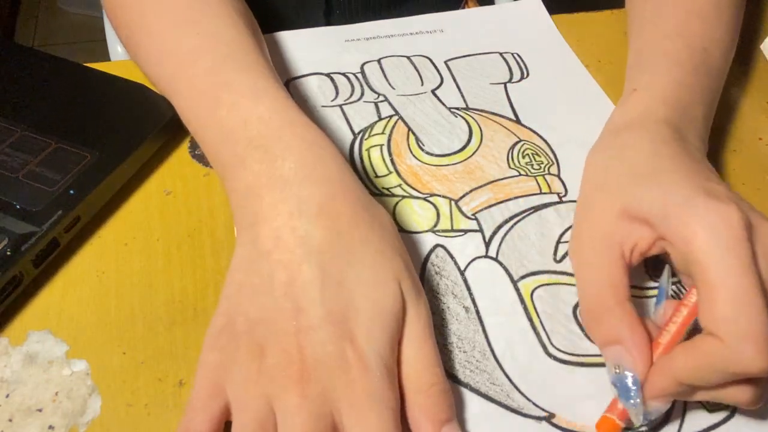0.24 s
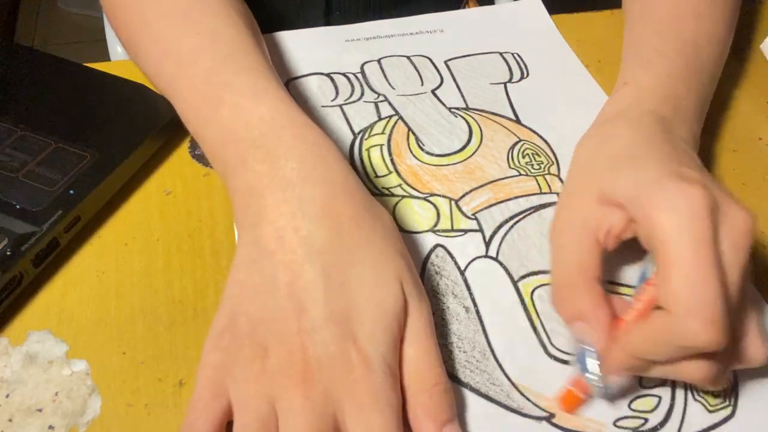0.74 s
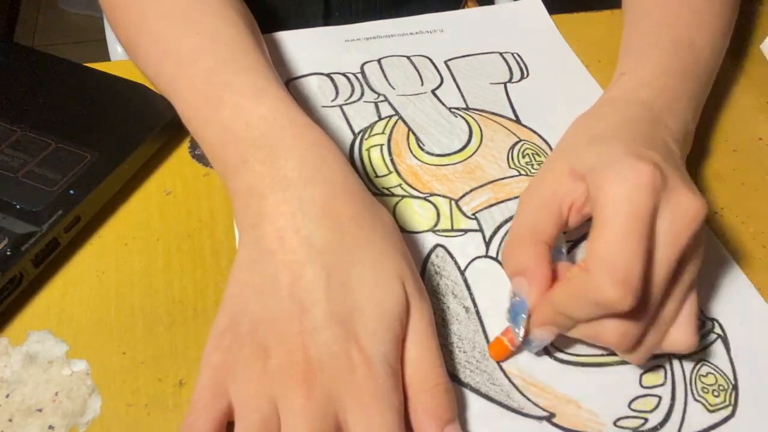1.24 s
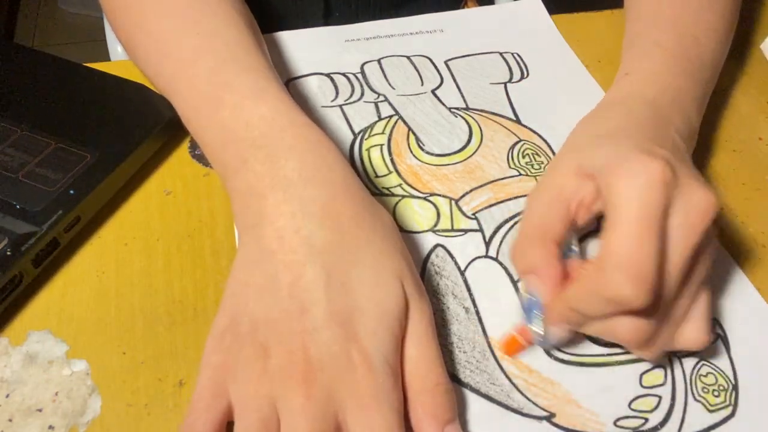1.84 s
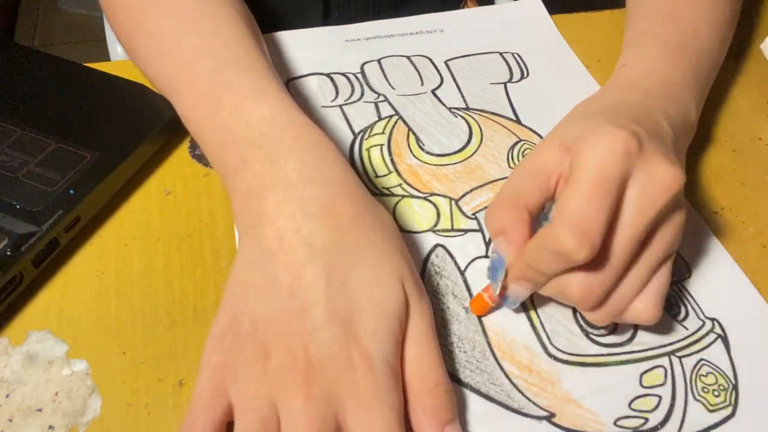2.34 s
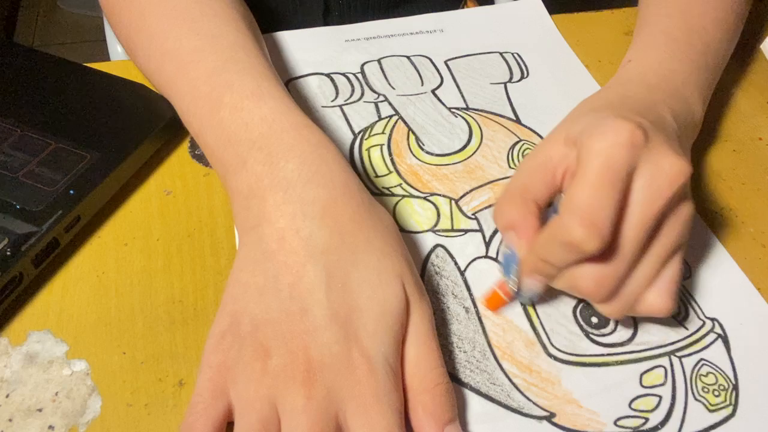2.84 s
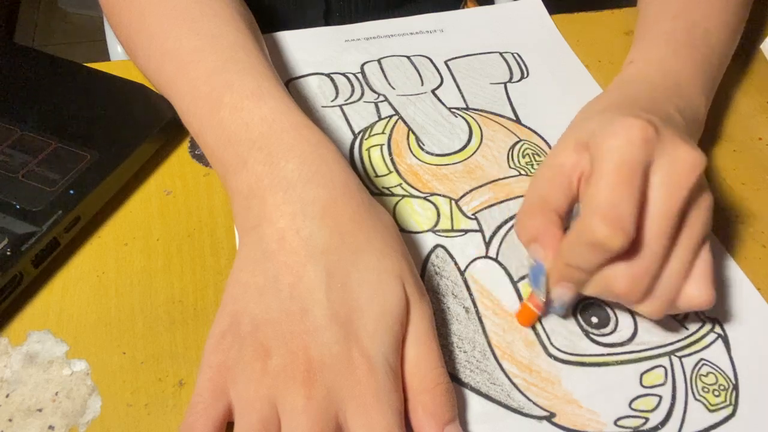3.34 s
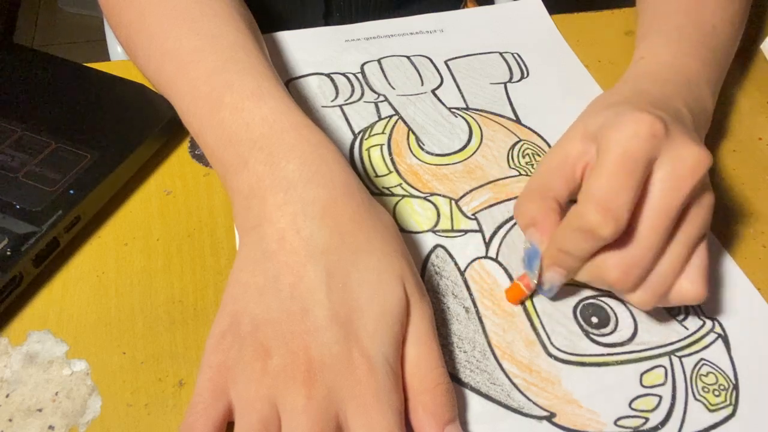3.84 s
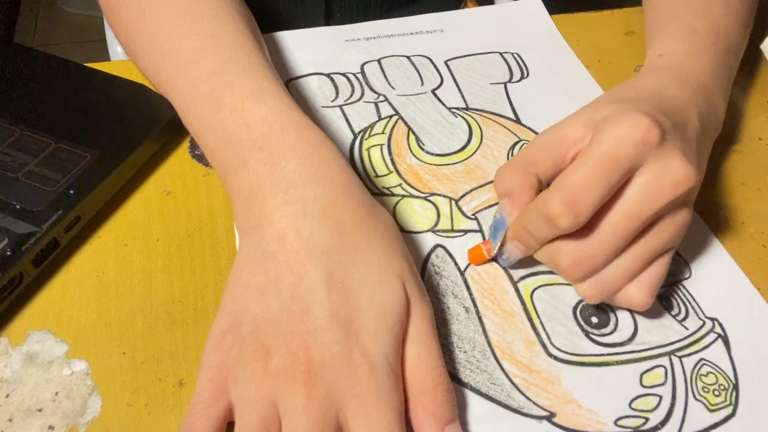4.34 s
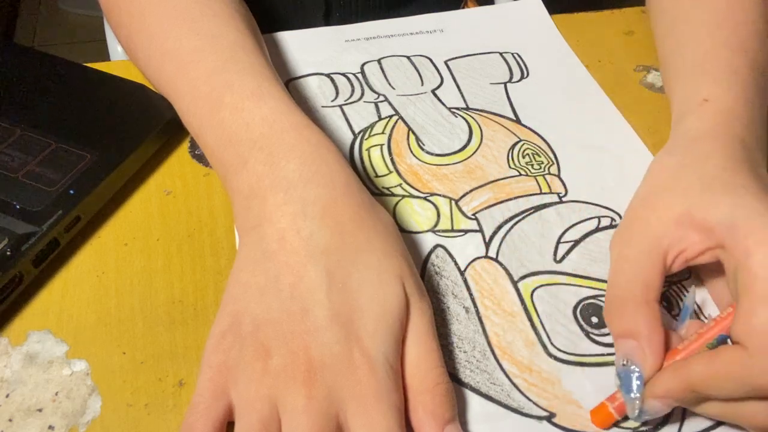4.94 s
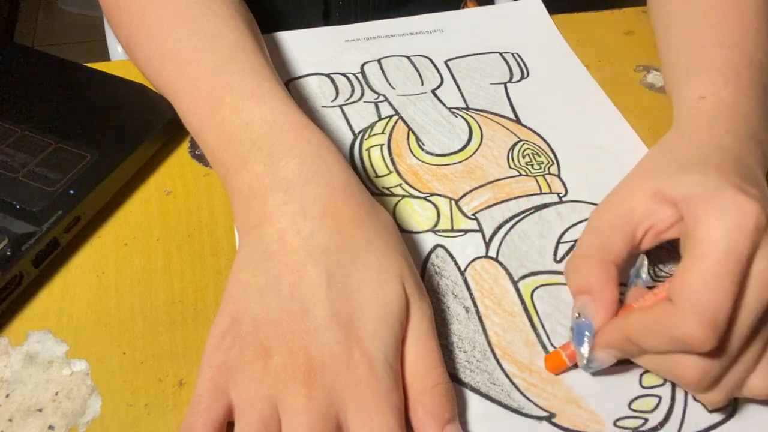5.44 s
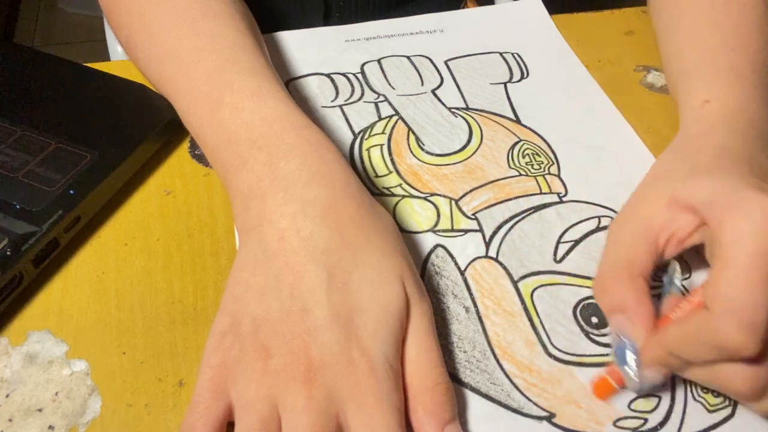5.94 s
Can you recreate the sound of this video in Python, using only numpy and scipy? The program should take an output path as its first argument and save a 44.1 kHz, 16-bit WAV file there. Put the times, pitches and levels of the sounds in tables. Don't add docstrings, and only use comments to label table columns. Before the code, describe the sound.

Quick, regular crayon scribbling on a paper sheet, a few hollow taps, a brief slide, then more scribbling above a steady deep hum.

```python
import sys
import numpy as np
from scipy import signal
from scipy.fft import rfft, irfft, next_fast_len
from scipy.io import wavfile

SR = 44100
rng = np.random.default_rng(int(sys.argv[2]) if len(sys.argv) > 2 else 0)


def invert_db(level):
    return 10 ** (np.asarray(level, dtype=float) / 20)


def persist_wave(psi):
    counts = np.round(np.clip(psi, -1, 1) * 32767).astype(np.int16)
    wavfile.write(sys.argv[1], SR, np.atleast_2d(counts).T)


N = 273420
T = np.arange(N) / SR
SIZE = next_fast_len(N + 4096)
HZ = np.arange(SIZE // 2 + 1) * SR / SIZE

# pitch_hz, in_step_s, level_db, left_minus_right_db
SHAFT_TONES = [(48.277, 1.73, -49.8, -6.5), (48.705, 1.73, -48.2, -5.9), (96.55, .307, -65, -3),
               (97.42, .307, -60.6, -9.6)]
BLADE_TONES = [(144.76, .168, -49, -8.2), (148.57, .168, -45.7, -7.4), (145.459, .1702, -57.5, -9),
               (146.316, .166, -62, -7.3), (143.012, .1704, -62, -9)]
WHINE_TONES = [(167.98, 0, -63, -9), (200.6, 0, -56, -8.5), (248.89, 0, -70, -9), (1162.28, 0, -79.5, -2),
               (1216, 0, -85, -2), (1287.42, 0, -87, 2)]
# time_s, level_db
SHAFT_LOAD = [(0, 0), (1.1, -0.5), (1.7, -1), (2.4, 2), (3.4, -0.5), (4.2, 1), (4.8, 0.5), (5.6, -1),
              (6.1, 2)]
BLADE_LOAD = [(0, -3), (.7, -1.5), (1.0, 0), (1.22, -6.5), (1.5, 1.5), (2.3, 1), (3, 0), (5.6, 0), (6.1, 3)]

# pitch_hz, level_db
DEEP_COLOUR = [(28, -23), (42, -8), (60, -5.5), (120, 1), (150, 0.5), (200, -23)]
RUMBLE_COLOUR = [(110, -38.5), (160, -4), (190, 0), (250, -7), (330, -12.5), (460, -11.5), (560, -27),
                 (700, -28)]
AIR_COLOUR = [(450, 28), (620, 13), (760, 25), (900, 22), (1150, 27), (1350, 19.5), (2150, 15.5),
              (2400, 7.5), (2800, 8), (3700, -5), (4800, 2), (6100, -4.5), (9000, -4.5), (11000, -10),
              (15600, -26)]
# pitch_hz, width_hz, lift_db
ROOM_MODES = [(65, 8, 6), (90, 4.3, -25), (127, 2.8, 5.5), (121.3, 24, -3.5), (250, 16, 5), (171, 5.4, 3.5),
              (179.3, 9.4, -5.5), (337, 51, -2), (345.5, 3.9, 7), (382, 14, -3), (411.4, 32, 2),
              (458.6, 9, 3), (700, 45, 7.5), (784, 48, -9), (1027, 34, 4), (7030, 580, 11)]
# time_s, level_db
DRAUGHT = [(0, -1), (.3, -2), (.9, 1.5), (1.2, 0), (1.8, 0.8), (2.2, -2), (2.6, 1.2), (3.2, 0.5), (4, -1.5),
           (5.1, 0.8), (5.6, -1), (6, 2.5)]
DEEP_DB, RUMBLE_DB, AIR_DB = -49.5, -51, -64.5
RUMBLE_FOLLOWS = 0.48

# pitch_hz, level_db
TIP_COLOUR = [(3000, -10), (5500, -5), (7000, -7), (8400, -2), (9300, -4.5), (10300, -9.5), (11700, -7.5),
              (12800, -5), (14000, -5.5), (15680, -9)]
SIZZLE_COLOUR = [(5800, -21.5), (6800, -3.5), (7600, -1), (8400, -1), (9300, -38)]
PAPER_COLOUR = [(1200, 9), (1800, 0), (2200, 5), (2550, 12.5), (3000, 2), (3800, 1.5), (4300, 0.5),
                (4900, 0), (6000, -9), (7500, -12)]
THRUM_COLOUR = [(200, 10), (350, 36), (700, 12.5), (1300, 13), (1800, -27.5), (2300, -3.5), (3200, -1)]
# pitch_hz, width_hz, lift_db
SHEET_MODES = [(2500, 160, -1.5), (3900, 370, 1), (4900, 170, -4.5), (8260, 730, -5.5), (12300, 210, 0)]
# pitch_hz, fade_60db_s, level_db
LOOSE_SHEET = [(1980, 0.013, -30), (2127, 0.0054, -2.5), (2500, 0.2, -13), (3200, 0.0055, -22),
               (3920, 0.015, -17.5), (4900, 0.026, -15), (5680, 0.022, -24), (7650, 0.018, -9)]
# middle_s, hiss_db, weight_db
FIRST_PATCH = [(.075, -80.5, 5), (.201, -72.5, -0.5), (.349, -72.5, 2.5), (.481, -70, -1), (.626, -69, 0.5),
               (.76, -67, -1.5), (.902, -68.5, -4), (1.034, -69.5, -1), (1.179, -71, 0), (1.313, -67.5, 1),
               (1.462, -70.5, 0), (1.599, -72, 2), (1.752, -70.5, -2), (1.879, -70, -1), (2.019, -70, 0),
               (2.157, -70.5, 1), (2.3, -67, -1.5), (2.435, -68.5, 1), (2.577, -67.5, -3),
               (2.71, -70.5, -0.5), (2.857, -69, -2), (2.994, -70.5, 1), (3.135, -69.5, 1.5),
               (3.277, -70, 1), (3.415, -69.5, 1.5), (3.556, -70, 2.5), (3.691, -70, 0.5), (3.834, -73, 3),
               (3.961, -71.5, -1), (4.09, -77.5, 3.5)]
# middle_s, hiss_db, weight_db
SECOND_PATCH = [(5.123, -75, 2), (5.25, -70, -1.5), (5.402, -72, 2.5), (5.537, -69.5, 3),
                (5.684, -68.5, -1.5), (5.823, -69, 0), (5.963, -69.5, -5), (6.095, -72, 1), (6.235, -73, 7)]
# middle_s, width_s, hiss_db
GLIDES = [
    (4.235, 0.083, -77.5),
    (4.37, 0.14, -79.5),
    (4.485, 0.15, -70),
    (4.573, .13, -67),
    (4.763, .13, -77),
    (2.645, 0.076, -76),
]
# width_s, body_over_hiss_db, thrum_over_body_db, sizzle_over_hiss_db
OUT = (0.0844, 0.33, 0.89, 1.8)
BACK = (0.0745, 0.6, 0.8, -0.56)
GLIDING = (-12, 1.4)
GLIDING_BODY_DB = 1.6
BODY_FOLLOWS = 0.35
SECOND_BODY_DB, SECOND_THRUM_DB = -2, 1.5
UNEVEN_DB = 0.88

# start_s, level_db, pitch_hz
KNOCKS = [(1.257, -40.5, 1390), (1.269, -52, 1290), (1.491, -56, 1300), (1.955, -56, 1280),
          (2.142, -62, 1350), (2.316, -43, 1276), (2.408, -58, 1270), (2.588, -42.5, 1450),
          (2.6, -49, 1410), (3.138, -56, 1290), (3.237, -49.5, 1370), (3.357, -57, 1330),
          (5.098, -56, 1290)]
# start_s, level_db, pitch_hz
NAIL_TICKS = [(.012, -68, 5000), (.161, -63, 4840), (.432, -68, 4900), (.683, -65, 4900),
              (1.027, -59, 4900), (1.258, -55, 4800), (1.268, -59, 4850), (1.279, -56, 4900),
              (1.466, -65, 4700), (1.491, -52.5, 3200), (1.868, -62, 4700), (1.955, -55.5, 2980),
              (2.142, -69, 3300), (2.316, -58, 4750), (2.589, -48.5, 4720), (2.591, -49.5, 3150),
              (2.59, -49, 7870), (2.608, -62, 4950), (2.646, -55, 4870), (2.664, -64, 4730),
              (3.137, -64, 3200), (3.237, -62, 2500), (4.926, -72, 4800), (5.228, -66, 3900)]
# pitch_hz, level_db
CRACK_COLOUR = [(1500, -22), (2500, 2), (3200, -2), (4000, -0.5), (6000, -5), (8000, -3), (11000, -15.5),
                (15500, -27)]
KNOCK_CRACK_DB, NAIL_CRACK_DB = -15.5, -15
NAIL_T60_S, NAIL_DRAG_S = 0.014, 0.006

SQUEAK_S, SQUEAK_HZ, SQUEAK_DB = (0.53, 0.74), (15400, 12300), -81

# pitch_hz, left_leads_rad, likeness_0_to_1, left_minus_right_db
PORTS = [(20, -.35, .97, -6), (170, -.05, .93, -6.5), (300, .7, .5, -3.3), (450, 1.3, .75, -2.3),
         (700, 3.1, .7, .3), (1500, 12.0, .45, -.5), (3300, 25.0, .3, 0), (5200, 27.7, .38, 0),
         (6600, 33.0, .2, -2.5), (7500, 35.5, .62, -3.5), (8600, 35.2, .66, -3), (9300, 34.5, .84, -.3),
         (14600, 28.3, .92, 0), (15700, 27.0, .85, 0)]


def rms_one(x):
    return x / np.sqrt(np.mean(x ** 2) + 1e-20)


def coloured(x, spectrum, modes=()):
    hz, db = np.transpose(spectrum)
    level_db = np.interp(np.log(HZ + 1), np.log(hz), db, left=-90, right=-90)
    for centre_hz, width_hz, lift_db in modes:
        level_db = level_db + lift_db * np.exp(-2 * ((HZ - centre_hz) / width_hz) ** 2)
    return rms_one(irfft(rfft(x, SIZE) * invert_db(level_db), SIZE)[..., :N])


def drift(rate):
    knots = rng.standard_normal(int(T[-1] * 200) + 400)
    r = np.exp(-2 * np.pi * rate / 200)
    slow = signal.lfilter([1], [1, -2 * r, r * r], knots)[300:]
    return np.interp(T * 200, np.arange(len(slow)), rms_one(slow - slow.mean()))


def ring(x, hz, t60):
    r, w = invert_db(-60 / (t60 * SR)), 2 * np.pi * hz / SR
    return signal.lfilter([0, np.sin(w)], [1, -2 * r * np.cos(w), r * r], x + 1e-18)


def tones(lines, lead):
    out = np.zeros((2, N))
    for hz, in_step_s, level_db, balance_db in lines:
        phase = 2 * np.pi * hz * (T - in_step_s)
        left = invert_db(balance_db) * np.cos(phase + lead)
        out += np.sqrt(2) * invert_db(level_db) * np.array([left, np.cos(phase)])
    return out


def motors():
    shafts = invert_db(np.interp(T, *np.transpose(SHAFT_LOAD))) * tones(SHAFT_TONES, lead=-0.48)
    blades = invert_db(np.interp(T, *np.transpose(BLADE_LOAD))) * tones(BLADE_TONES, lead=0.035)
    whines = invert_db(0.8 * drift(1.5)) * tones(WHINE_TONES, lead=0.067)
    return shafts + blades + whines


def room_noise():
    draught_db = np.interp(T, *np.transpose(DRAUGHT))
    deep = coloured(rng.standard_normal((2, N)), DEEP_COLOUR, ROOM_MODES)
    rumble = coloured(rng.standard_normal((2, N)), RUMBLE_COLOUR, ROOM_MODES)
    air = coloured(rng.standard_normal((2, N)), AIR_COLOUR, ROOM_MODES)
    deep = invert_db(DEEP_DB + draught_db) * deep
    rumble = invert_db(RUMBLE_DB + RUMBLE_FOLLOWS * draught_db) * rumble
    return deep + rumble + invert_db(AIR_DB + 0.4 * drift(2.7)) * air


def strokes():
    rows = []   # middle_s, width_s, hiss_db, body_db, thrum_db, sizzle_db
    patches = [(FIRST_PATCH, (OUT, BACK), 0, 0),
               (SECOND_PATCH, (BACK, OUT), SECOND_BODY_DB, SECOND_THRUM_DB)]
    for patch, kinds, patch_body_db, patch_thrum_db in patches:
        for k, (middle, hiss_db, weight_db) in enumerate(patch):
            width, body_db, thrum_db, sizzle_db = kinds[k % 2]
            body_db += patch_body_db + BODY_FOLLOWS * weight_db
            thrum_db += patch_thrum_db + weight_db
            rows.append((middle, width, hiss_db, body_db, thrum_db, sizzle_db))
    for middle, width, hiss_db in GLIDES:
        rows.append((middle, width, hiss_db, GLIDING_BODY_DB, *GLIDING))
    rows = np.array(rows)
    rows[:, 3:] += UNEVEN_DB * rng.standard_normal((len(rows), 3))
    return rows


def grains(per_s, spread_db):
    sizes = invert_db(spread_db * np.minimum(rng.exponential(1, (2, N)), 5))
    sizes = sizes * rng.choice([-1, 1], (2, N))
    return sizes * (rng.random((2, N)) < per_s / SR)


def flutter(slips):
    out = np.zeros((2, N))
    for hz, t60, level_db in LOOSE_SHEET:
        out += invert_db(level_db + 2.8 * drift(5.6)) * rms_one(ring(slips, hz, t60))
    return out


def crayon():
    hiss, body, thrum, sizzle = np.zeros((4, N))
    for middle, width, hiss_db, body_db, thrum_db, sizzle_db in strokes():
        near = slice(max(int((middle - 1.5 * width) * SR), 0), int((middle + 1.5 * width) * SR))
        speed = np.cos(np.pi * np.clip((T[near] - middle) / (1.85 * width), -0.5, 0.5)).clip(0)
        hiss[near] += (invert_db(hiss_db + 3.5) * speed ** 2.37) ** 2
        sizzle[near] += (invert_db(hiss_db + sizzle_db - 3.0) * speed ** 1.55) ** 2
        body[near] += (invert_db(hiss_db + body_db + 1.5) * speed ** 1.6) ** 2
        thrum[near] += (invert_db(hiss_db + body_db + thrum_db + 10.5) * speed ** 1.8) ** 2
    linger = np.exp(-1 / (0.0029 * SR))
    body, thrum = signal.lfilter([1 - linger], [1, -linger], [body, thrum])

    grip = drift(29)
    fine = grains(14000, spread_db=2.5)
    tip = np.sqrt(hiss) * invert_db(1.1 * grip) * coloured(fine, TIP_COLOUR, SHEET_MODES)
    sizzling = coloured(fine[:, ::-1], SIZZLE_COLOUR, SHEET_MODES)
    tip += np.sqrt(sizzle) * invert_db(0.94 * grip + 2.3 * drift(28)) * sizzling

    catch = grains(5000, spread_db=2.5)
    sheet = invert_db(1.23 * drift(25)) * coloured(catch, PAPER_COLOUR, SHEET_MODES) + flutter(catch)
    table = invert_db(1.2 * drift(18)) * coloured(catch, THRUM_COLOUR)
    sheet = np.sqrt(body) * invert_db(1.1 * grip) * sheet
    table = np.sqrt(thrum) * invert_db(0.89 * grip) * table
    return tip + sheet + table


def nail_ring(noise, after, hz):
    drag = (1 - np.exp(-after / 0.0006)) * np.exp(-(after / NAIL_DRAG_S) ** 2)
    return ring(ring(noise * drag, hz, NAIL_T60_S), hz, 0.003)


def sheet_knock(noise, after, touch, hz):
    later = np.interp(after - 0.0025, after, touch, left=0)
    return ring(ring(noise * later ** 2, hz, 0.009), hz, 0.004)


def ticks():
    out, length = np.zeros((2, N)), int(0.15 * SR)
    scratch = coloured(rng.standard_normal((2, N)), CRACK_COLOUR, SHEET_MODES)
    after = np.arange(length) / SR
    touch = (1 - np.exp(-after / 0.0006)) * np.exp(-after / 0.003)
    touch += 0.16 * np.exp(-after / 0.025)
    for k, (start_s, level_db, hz) in enumerate(KNOCKS + NAIL_TICKS):
        noise = rng.standard_normal((2, length))
        if k < len(KNOCKS):
            body, crack_db = sheet_knock(noise, after, touch, hz), KNOCK_CRACK_DB
        else:
            body, crack_db = nail_ring(noise, after, hz), NAIL_CRACK_DB
        at = int((start_s - 0.002) * SR)
        crack = invert_db(crack_db) * touch * scratch[:, at:at + length]
        out[:, at:at + length] += invert_db(level_db) * (body / np.abs(body).max() + crack)
    return out


def squeak():
    swell = np.sin(np.pi * np.interp(T, SQUEAK_S, (0, 1))) ** 0.5
    phase = 2 * np.pi * np.cumsum(np.interp(T, SQUEAK_S, SQUEAK_HZ)) / SR
    return invert_db(SQUEAK_DB) * swell * np.sin(phase)


def ports(shared, other):
    hz, lead, alike, balance_db = np.transpose(PORTS)
    alike = np.clip(np.interp(HZ, hz, alike), 0, 1)
    left = alike * np.exp(1j * np.interp(HZ, hz, lead)) * rfft(shared, SIZE)
    left += np.sqrt(1 - alike ** 2) * rfft(other, SIZE)
    left *= invert_db(np.interp(HZ, hz, balance_db))
    return np.array([irfft(left, SIZE)[:N], shared])


def scene():
    shared, other = room_noise() + crayon() + ticks() + squeak()
    return motors() + ports(shared, other)


def roll_off(x):
    return signal.sosfilt(signal.butter(12, 15700, fs=SR, output="sos"), x)


def record(dry):
    return roll_off(dry)


dry = scene()
out = record(dry)
persist_wave(out)
```